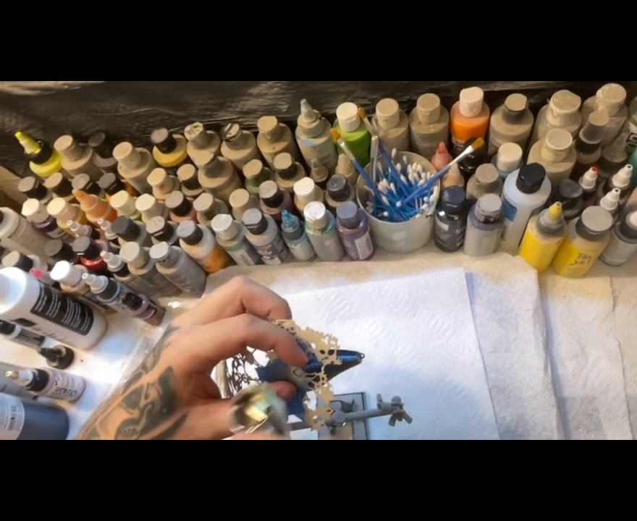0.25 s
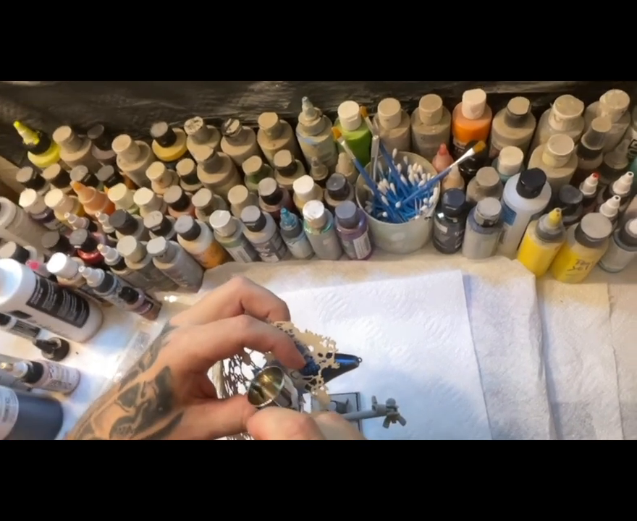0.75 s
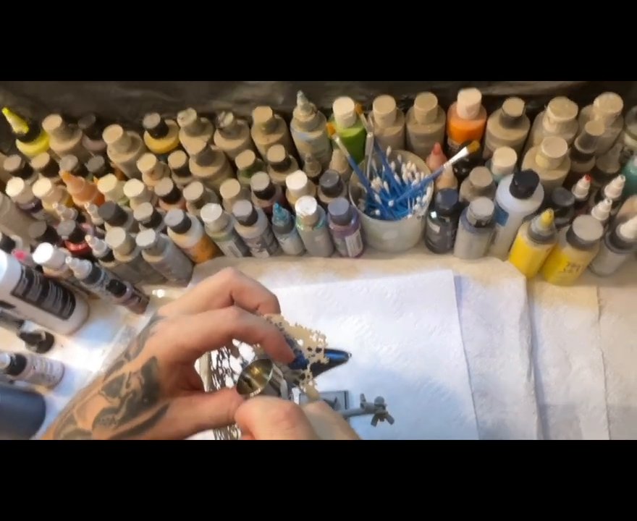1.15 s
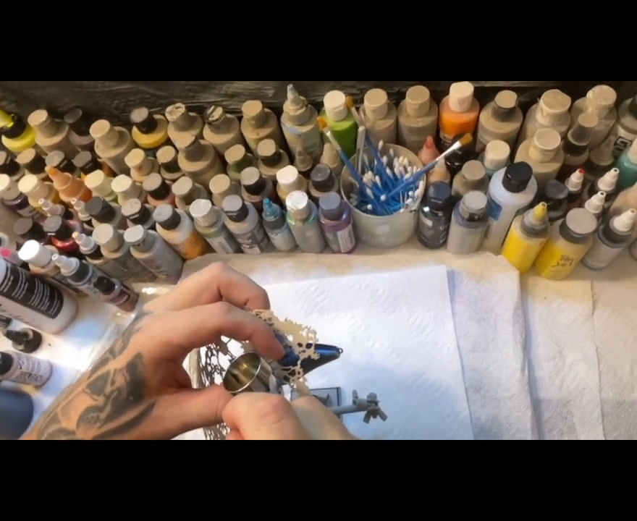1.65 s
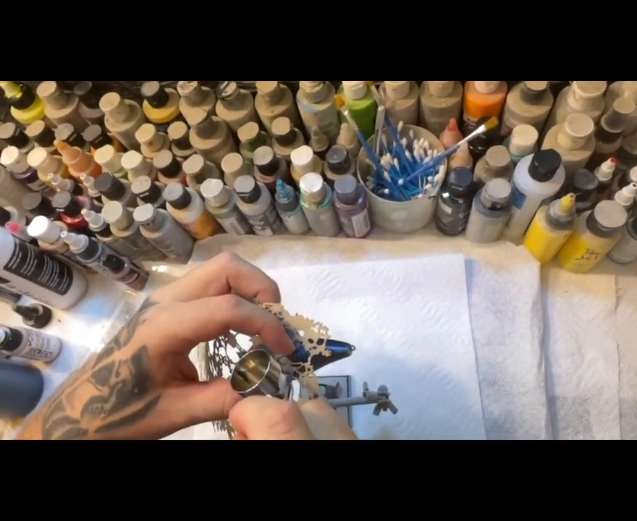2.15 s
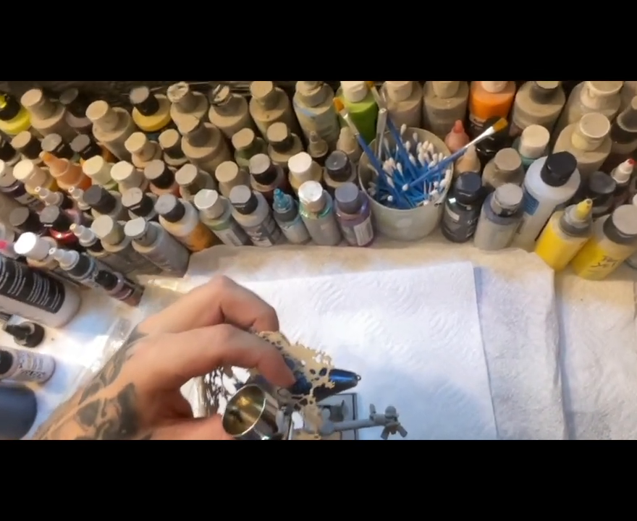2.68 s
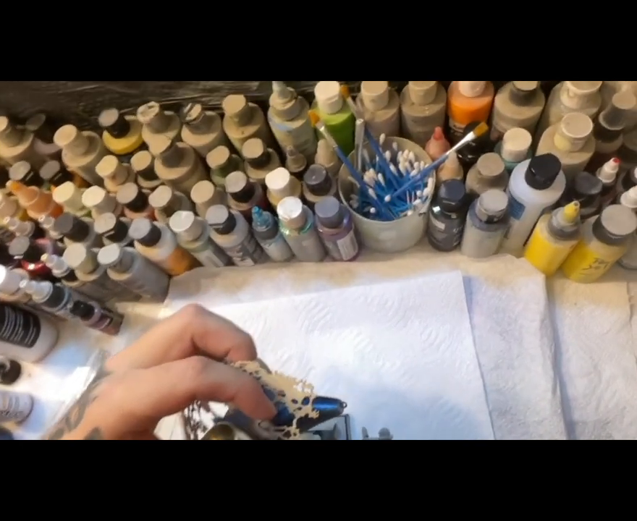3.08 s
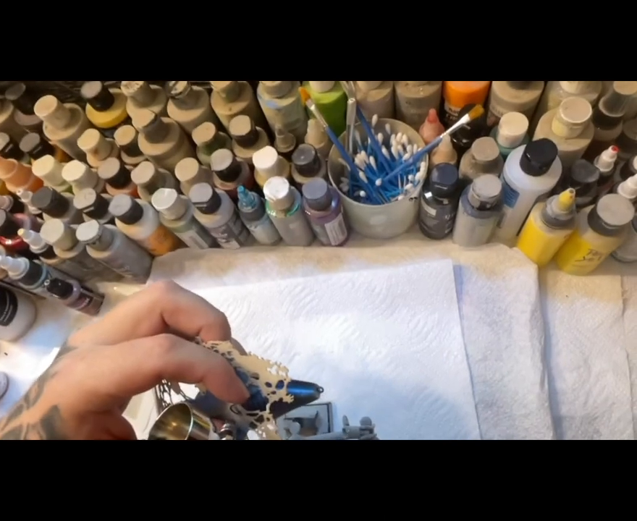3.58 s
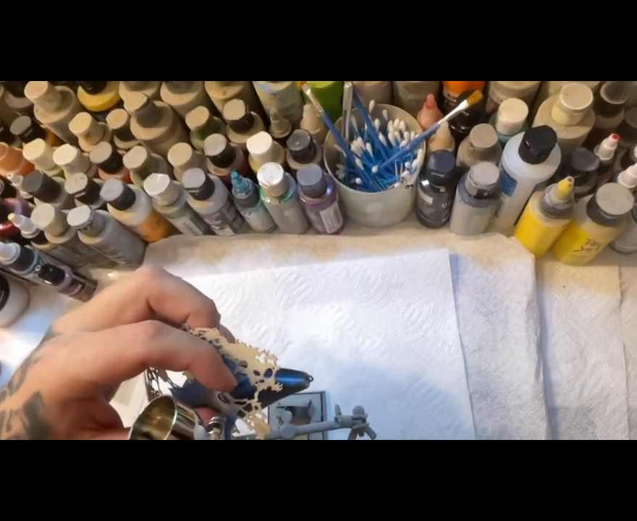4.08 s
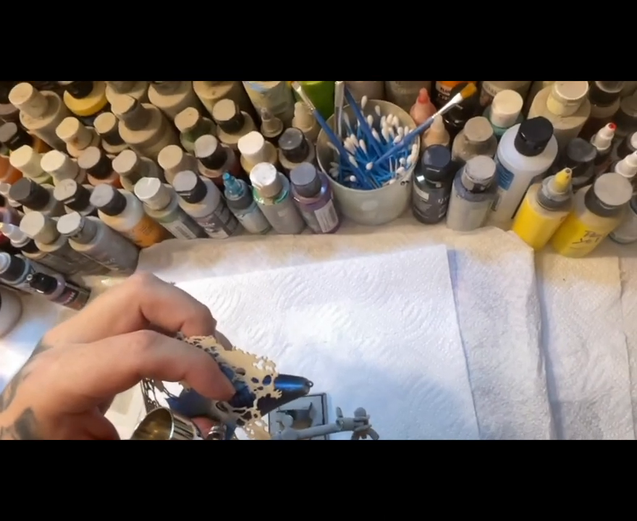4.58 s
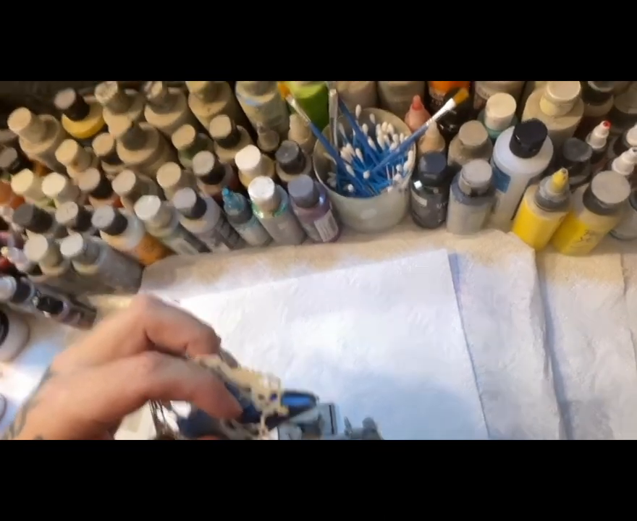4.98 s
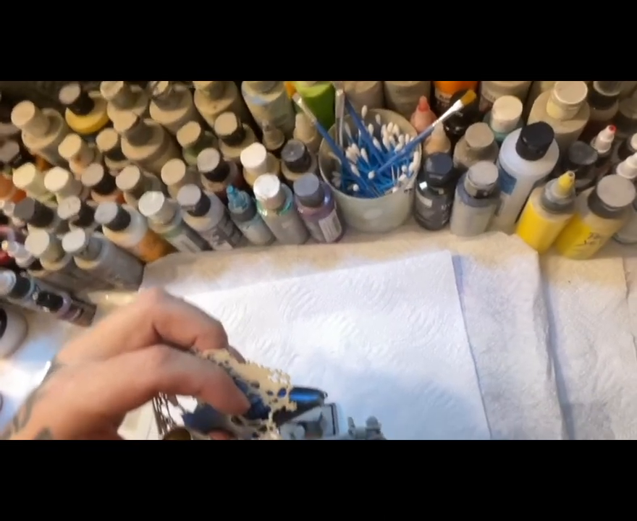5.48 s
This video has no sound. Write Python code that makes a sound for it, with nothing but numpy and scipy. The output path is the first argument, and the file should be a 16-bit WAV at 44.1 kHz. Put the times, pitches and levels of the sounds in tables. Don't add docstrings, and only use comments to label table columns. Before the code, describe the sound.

After a soft low hum and a small desk rub, compressed air hisses on abruptly, then grows into a strong, bright, slightly fluttering spray.

```python
import sys
import numpy as np
from scipy import signal
from scipy.fft import rfft, irfft, next_fast_len
from scipy.io import wavfile
from scipy.ndimage import uniform_filter1d

SR = 44100
rng = np.random.default_rng(int(sys.argv[2]) if len(sys.argv) > 2 else 0)


def master_out(mix):
    frames = np.transpose(np.atleast_2d(mix))
    ceiling = np.clip(frames, -1, 1)
    pcm = np.round(ceiling * 32767).astype(np.int16)
    wavfile.write(sys.argv[1], SR, pcm)


def natural_amplitude(level_db):
    exponent = np.asarray(level_db, float) / 20
    return 10 ** exponent


N = 253292
TIME = np.arange(N) / SR
LONG = next_fast_len(N)


def unit(x):
    return x / np.sqrt(np.mean(x ** 2))


def noise(colour, peaks=(), lift_db=9):
    hz = np.maximum(np.fft.rfftfreq(LONG, 1 / SR), 1)
    point_hz, point_db = np.transpose(colour)
    gain = natural_amplitude(np.interp(np.log(hz), np.log(point_hz), point_db, left=-120, right=-120))
    ring = 0
    for peak_hz, width_hz, peak_db in peaks:
        ring = ring + natural_amplitude(peak_db + lift_db) ** 2 / (1 + (2 * (hz - peak_hz) / width_hz) ** 2)
    white = rfft(rng.standard_normal(LONG))
    return irfft(white * gain * np.sqrt(1 + ring), LONG)[:N]


def band_rms(x, low_hz, high_hz):
    spectrum, hz = rfft(x, LONG), np.fft.rfftfreq(LONG, 1 / SR)
    inside = (hz > low_hz) & (hz < high_hz)
    return np.sqrt(2 * np.sum(np.abs(spectrum[inside]) ** 2) / N / LONG)


def split(x, hz):
    low = signal.sosfiltfilt(signal.butter(4, hz, fs=SR, output="sos"), x)
    return low, x - low


def walk(rate_hz):
    hold = int(SR / rate_hz)
    steps = np.repeat(rng.standard_normal(N // hold + 1), hold)
    return unit(uniform_filter1d(uniform_filter1d(steps, hold), hold)[:N])


# pitch_hz, level_db (rms), crest_s, wobble_db
HUM_TONES = [(58.64, -56, .00756, .25), (117.26, -64.2, .00553, .8), (119.97, -60.9, .00318, .5),
             (175.89, -76, .0048, 1), (234.52, -78, .00345, 1), (239.95, -69, .00181, .8),
             (2857, -84, 0, 1.2)]


def hum():
    total = 0
    for pitch_hz, level_db, crest_s, wobble_db in HUM_TONES:
        level = np.sqrt(2) * natural_amplitude(level_db + wobble_db * walk(6))
        total = total + level * np.cos(2 * np.pi * pitch_hz * (TIME - crest_s))
    return total


# freq_hz, density_db (per Hz)
FLOOR_COLOUR = [(180, -30), (300, 0), (600, -5), (900, -8), (1600, -11), (2900, -14), (4000, -17.5),
                (7200, -22), (9000, -27), (15750, -31)]
# freq_hz, density_db (per Hz)
RUMBLE_COLOUR = [(20, -35), (40, -11), (52, 2), (75, -1.5), (100, -4.5), (150, -3), (200, -6), (270, -15),
                 (330, -30)]
FLOOR_DB, RUMBLE_DB = -69, -61


def room():
    floor = noise(FLOOR_COLOUR)
    floor = floor / band_rms(floor, 1370, 12000) * natural_amplitude(FLOOR_DB + 0.56 * walk(5.0))
    rumble = unit(noise(RUMBLE_COLOUR)) * natural_amplitude(RUMBLE_DB + 0.21 * walk(2.66))
    return floor + rumble


# centre_s, length_s, pitch_hz, width_hz, level_db (rms)
HAND_TOUCHES = [
    (.95, .05, 152, 20, -54.5),
    (.99, .025, 210, 60, -62),
    (.97, .045, 6200, 2500, -74),
    (.01, .015, 3100, 400, -70),
    (.015, .01, 8400, 300, -78),
    (1.02, .03, 11300, 1200, -84),
    (1.25, .17, 560, 300, -68),
    (1.36, .06, 850, 200, -70),
]


def hand():
    out = np.zeros(N)
    for centre_s, length_s, pitch_hz, width_hz, level_db in HAND_TOUCHES:
        colour = [(pitch_hz / 3, -40), (pitch_hz, -40), (pitch_hz * 2, -50)]
        rub = unit(noise(colour, [(pitch_hz, width_hz, 0)], lift_db=30))
        swell = np.exp(-.5 * ((TIME - centre_s) / length_s) ** 2)
        out += natural_amplitude(level_db) * swell * rub
    return out


LEAK_S, LEAK_DB, LEAK_GROWTH_DB, LEAK_TIME_S = 1.3, -60, 47, .042
OPEN_S, OPEN_TIME_S = 1.478, .0045


def trigger():
    since_s = TIME - LEAK_S
    growth = 1 - np.exp(-np.maximum(since_s, 0) / LEAK_TIME_S)
    leak = natural_amplitude(LEAK_DB + LEAK_GROWTH_DB * growth) * (since_s > 0)
    valve = .5 + .5 * np.tanh((TIME - OPEN_S) / OPEN_TIME_S)
    return leak + (1 - leak) * valve


# time_s, level_db
AIM_PATH = [(1.5, -40), (1.82, -40), (2.24, -43.5), (2.7, -38), (2.76, -34), (3.3, -25.5), (3.6, -24.5),
            (4.05, -27.5), (4.42, -24), (4.6, -27.5), (4.9, -25), (5.15, -26.5), (5.74, -28)]
GRAZE_DB = -40


def hit():
    time_s, level_db = np.transpose(AIM_PATH)
    hit_db = np.interp(TIME, time_s, level_db)
    return hit_db, hit_db - GRAZE_DB


# peak_s, rise_s, fall_s, level_db
DESK_GUSTS = [
    (1.5, .03, 0.46, 7),
    (2.85, 0.12, 1, 5.5),
    (4.22, 0.062, 0.21, 4),
    (5.3, 0.45, 0.23, 1.5),
    (5.6, .08, .1, 2.5),
]


def gusts():
    total_db = 0
    for peak_s, rise_s, fall_s, level_db in DESK_GUSTS:
        side_s = np.where(TIME < peak_s, rise_s, fall_s)
        total_db = total_db + level_db * np.exp(-((TIME - peak_s) / side_s) ** 2)
    return total_db


# freq_hz, density_db (per Hz)
JET_COLOUR = [(700, -19), (1100, -17), (1200, -9), (1550, -8), (2000, -3.5), (2600, 2.5), (3400, -23)]
# pitch_hz, width_hz, level_db
NOZZLE_RINGS = [(1274, 126, 10.5), (1687, 143, 9.5), (2085, 60, 10), (2314, 140, 6.5), (2804, 110, 8.5)]
# freq_hz, density_db (per Hz)
DESK_RUSH_COLOUR = [(120, -54), (200, -18), (227, 2), (264, -5.5), (383, 2), (727, -4.5), (1100, -7),
                    (1430, -22), (2420, -120)]
JET_DB, JET_PER_HIT_DB, JET_SWELL_DB_PER_S = -55, 0.1953, 0.47
RUSH_DB = -63


def nozzle():
    jet_db = JET_DB + JET_PER_HIT_DB * hit()[1] + JET_SWELL_DB_PER_S * (TIME - OPEN_S)
    jet = noise(JET_COLOUR, NOZZLE_RINGS, lift_db=2.5)
    jet = jet / band_rms(jet, 1300, 2000)
    rush_db = RUSH_DB + gusts() + 1.46 * walk(12)
    rush = unit(noise(DESK_RUSH_COLOUR))
    return natural_amplitude(jet_db - 1.0) * jet + natural_amplitude(rush_db) * rush


# freq_hz, density_db (per Hz)
GRAZE_COLOUR = [(530, -29), (900, -3.5), (1160, -16), (1620, -11.5), (1980, -9.5), (3160, -8), (4760, -8),
                (4990, -8.5), (9520, -6.5), (14500, -1), (15730, 0)]
# freq_hz, density_db (per Hz)
STRUCK_COLOUR = [(1060, -32.5), (1800, -27), (3050, -10), (4070, -2.5), (4460, -6.5), (5600, -3),
                 (6710, -5), (7620, -2.5), (9300, -5), (14000, -4), (15730, -5)]
# pitch_hz, width_hz, level_db
HAND_HOLLOWS = [
    [(4650, 76, 2), (6740, 220, 0.5), (10800, 49, 1), (11800, 90, -5), (13300, 160, -5), (14700, 250, -3)],
    [(4090, 180, 1.5), (5050, 130, -0.5), (7220, 89, 2.5), (12900, 160, -8), (14500, 54, -12),
     (15200, 70, -7)],
    [(4190, 200, -4.5), (5053, 200, -1.5), (6160, 370, 0.5), (6990, 67, 6), (7900, 100, 2.5),
     (11200, 430, 0.5), (12800, 130, 0), (13600, 230, 2.5), (13900, 160, -8), (14800, 190, -4),
     (15400, 230, -6)],
    [(4070, 340, -33), (5620, 400, -1), (7330, 64, 3.5), (7620, 200, -4.5), (7860, 64, -10),
     (11300, 190, -9), (11400, 240, 0.5), (13000, 290, -3), (14100, 230, -2), (15100, 85, -15)],
]
# leave_s, arrive_s
HAND_TURNS = [
    (1.9, 2.26),
    (2.65, 3.1),
    (3.85, 4.14),
]
TURN_TREBLE = [1.5, 1.5, 1, -.7]
TREBLE_PER_HIT_DB = -.15


def strike():
    hit_db, above_db = hit()
    turn = sum(np.interp(TIME, span, [0, 1]) for span in HAND_TURNS)
    treble_db = np.interp(turn, np.arange(4), TURN_TREBLE) + TREBLE_PER_HIT_DB * above_db
    graze = [(1900, -30)] + [(hz, db) for hz, db in GRAZE_COLOUR if hz > 2000]
    colours = [graze, graze, STRUCK_COLOUR, STRUCK_COLOUR]
    hiss = 0
    for k, hollows in enumerate(HAND_HOLLOWS):
        share = np.clip(1 - np.abs(turn - k), 0, 1)
        hiss = hiss + np.sqrt(share) * unit(noise(colours[k], hollows, lift_db=3))
    body, top = (part / np.sqrt(uniform_filter1d(part ** 2, size=8000)) for part in split(hiss, 9250))
    eddies_db = .5 * walk(9) + 0.22 * walk(90)
    return natural_amplitude(hit_db + eddies_db) * (body * natural_amplitude(-1.2) + top * natural_amplitude(treble_db))


# extra_path_ms, level_db, sway_ms
SURFACES = [(1.05, -19, .05), (1.45, -18, .05), (1.63, -19, .06), (2.1, -17, .05), (2.7, -16, .06),
            (3.6, -15, .06), (5.1, -15, .07), (7.3, -16, .07)]


def surroundings(x):
    fine = signal.resample_poly(x, up=4, down=1)
    echo = 0
    for extra_path_ms, level_db, sway_ms in SURFACES:
        heard_s = TIME - (extra_path_ms + sway_ms * walk(3)) / 1000
        echo = echo + natural_amplitude(level_db) * np.interp(heard_s * 4 * SR, np.arange(4 * N), fine)
    low, high = split(x, 8000)
    low_echo, high_echo = split(echo, 8000)
    total = np.sqrt(1 + np.sum(natural_amplitude(np.array(SURFACES)[:, 1]) ** 2))
    return low + natural_amplitude(-1.0) * low_echo + (high + high_echo) / total


def nulls(x, count=300):
    hz, s, cells = signal.stft(x, SR, nperseg=1024)
    for when, where, long, wide, drift in rng.random((count, 5)):
        since_s = s - (1.6 + 4.2 * when ** .7)
        now = np.abs(since_s) < .3
        centre_hz = 5500 + 10300 * where ** .6 + 1200 * (drift - .5) * since_s[now]
        width_hz = 40 + 70 * wide ** 2
        length_s = .035 + .11 * long ** 2
        far = ((hz[:, None] - centre_hz) / width_hz) ** 2 + (since_s[now] / length_s) ** 2
        cells[:, now] *= 1 - .97 * np.exp(-far ** 2)
    return signal.istft(cells, SR)[1][:N]


def scene():
    spray = trigger() * (nozzle() + strike())
    mono = nulls(surroundings(spray)) + hum() + room() + hand()
    return np.array([mono, mono])


def top_cut(x):
    return signal.sosfilt(signal.butter(12, 17060, fs=SR, output="sos"), x)


def record(dry):
    return top_cut(dry)


dry = scene()
out = record(dry)
master_out(out)
```